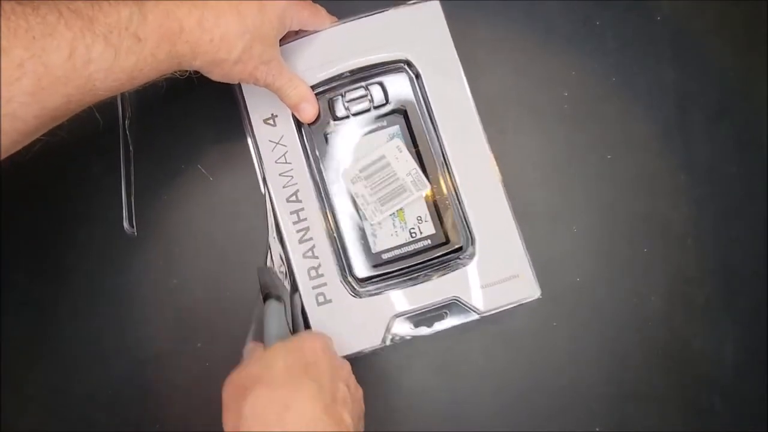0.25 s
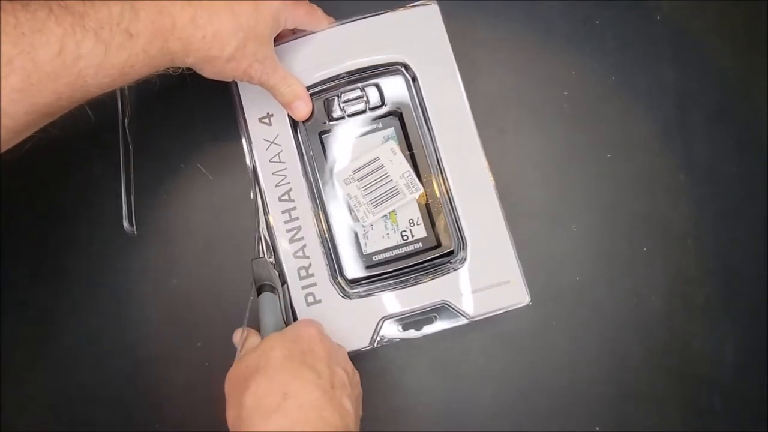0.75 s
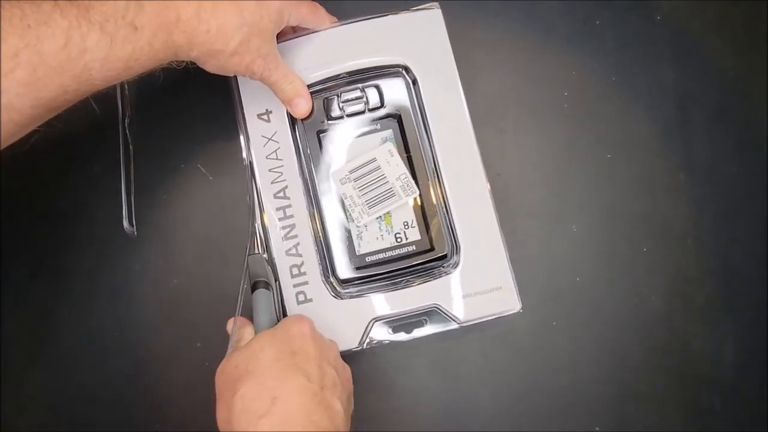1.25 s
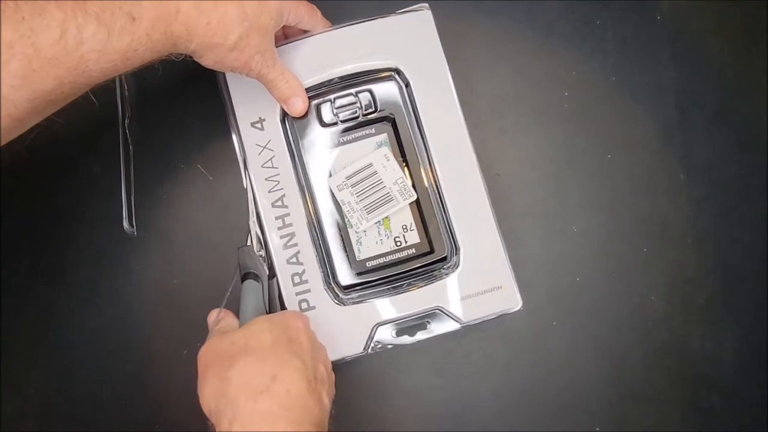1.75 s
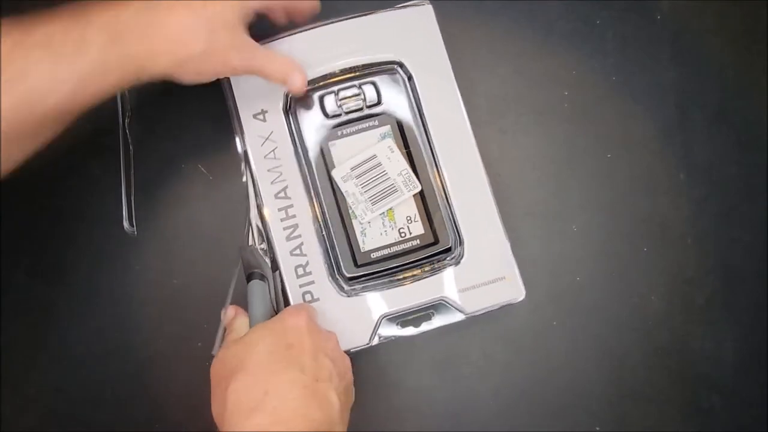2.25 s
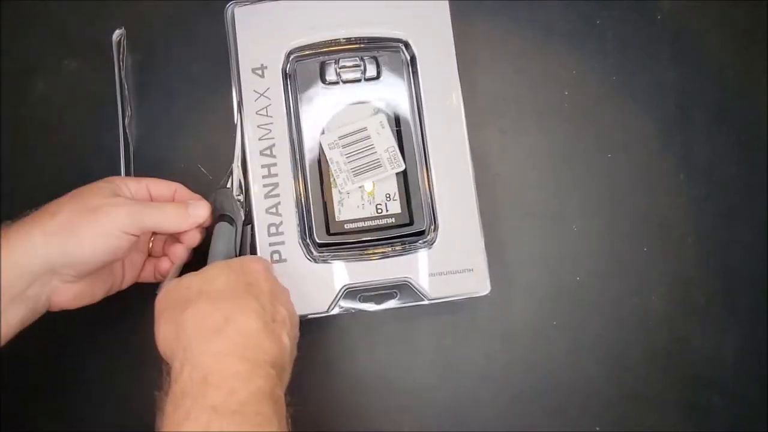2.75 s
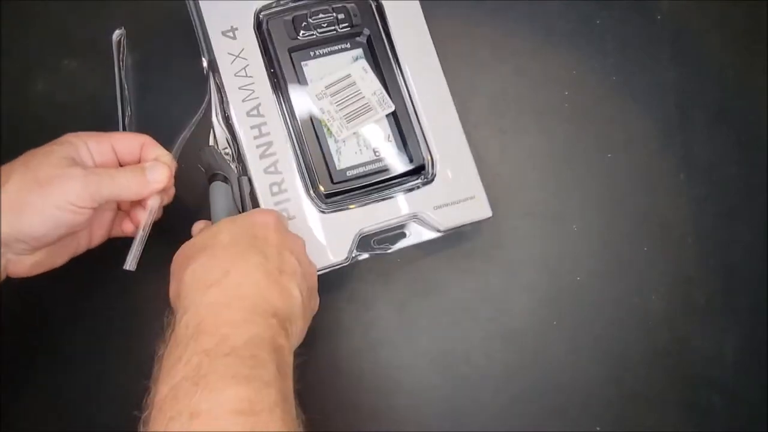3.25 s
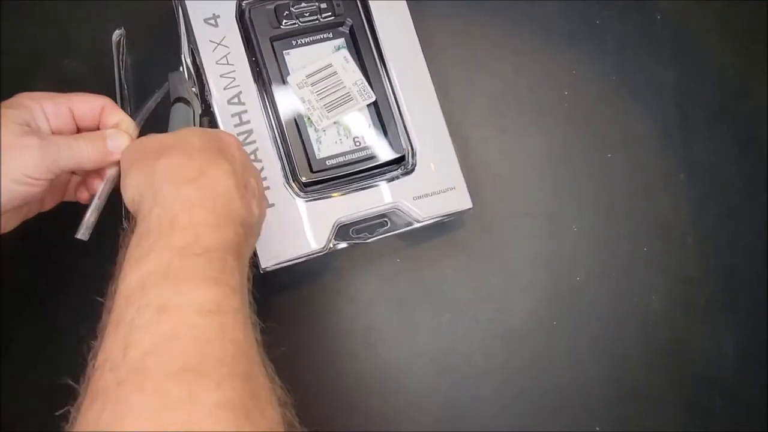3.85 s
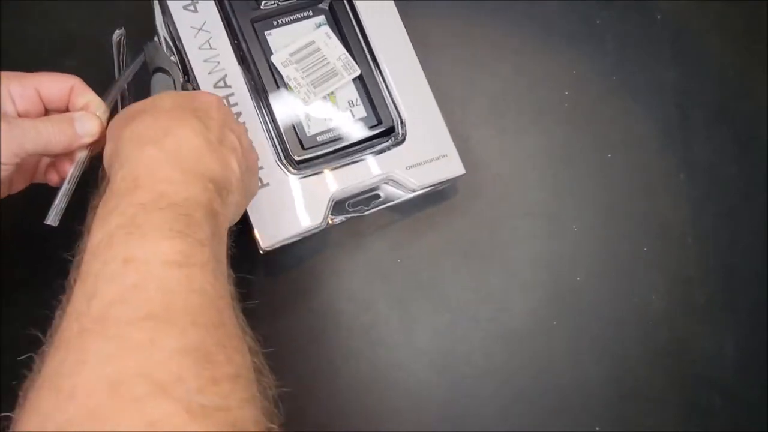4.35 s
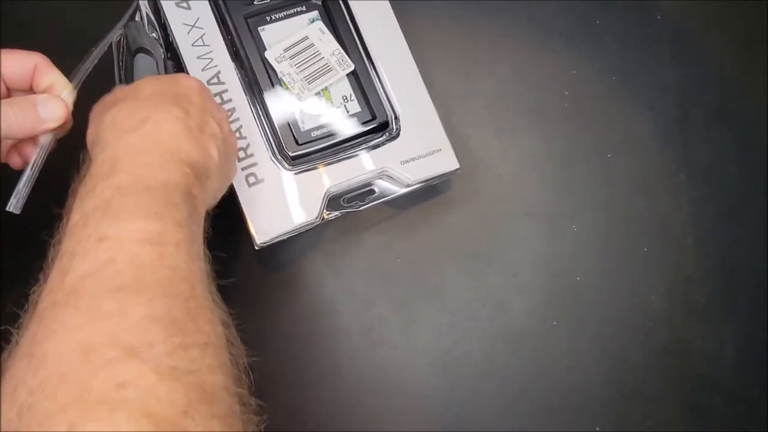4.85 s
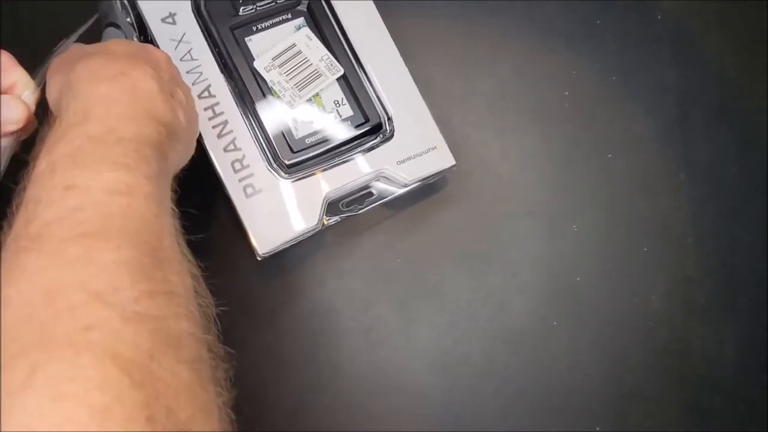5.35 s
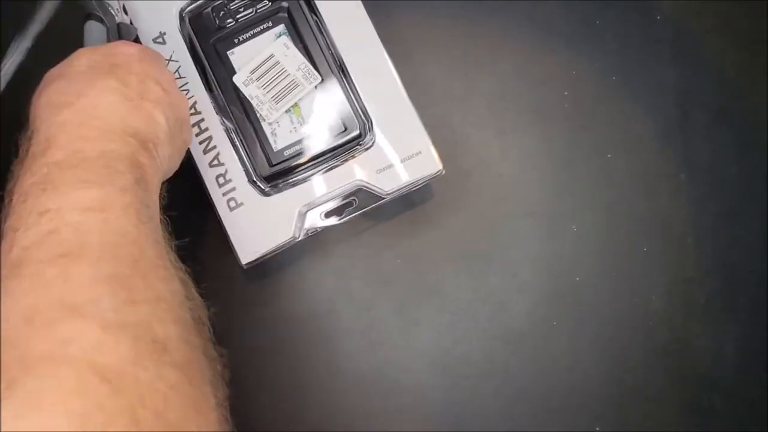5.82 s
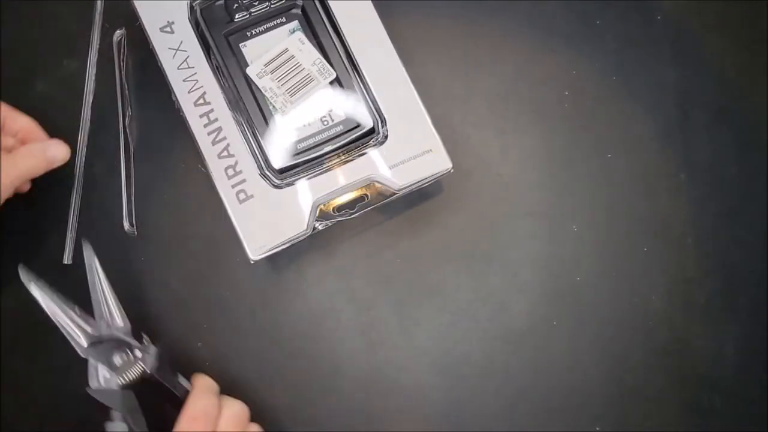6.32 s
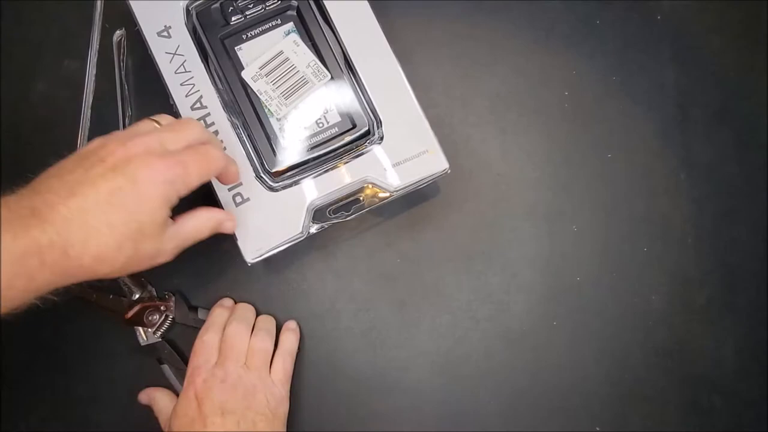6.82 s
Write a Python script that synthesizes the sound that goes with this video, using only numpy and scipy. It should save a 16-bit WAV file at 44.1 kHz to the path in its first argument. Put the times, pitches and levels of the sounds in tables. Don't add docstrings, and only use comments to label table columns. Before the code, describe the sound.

A small dry room, close stereo pickup, the action strongly to the left. At 0.1 s shears snap through stiff plastic: a bright crack, a short loose rattle, a hollow low-mid boom and a touch of steel ring. From 0.2 to 1.8 s come small ticks, film crackles, creaks and soft bumps of the pack. A lighter snip lands at 1.9 s, with a hollow knock at 2.2 s and shifting and rubbing afterward. From 3.1 s cuts come more often, at about 3.1, 3.3, 3.8, 4.1, 4.5, 5.2 and 5.3 s, with blade scrapes and crackling between. A snap at 5.55 s leads to the loudest fast double crack near 5.7 s. Then it falls nearly quiet: tiny ticks, a light tap at 6.2 s, a dull double thud on the table around 6.85 s, and faint brushing to 7.1 s. Faint hiss, low hum and a very thin whine lie underneath.

```python
import sys
import numpy as np
from scipy import signal
from scipy.fft import rfft, irfft, next_fast_len
from scipy.io import wavfile
from scipy.ndimage import uniform_filter1d, map_coordinates

SR = 44100
rng = np.random.default_rng(int(sys.argv[2]) if len(sys.argv) > 2 else 0)


def pcm_store(signal):
    levels = np.round(np.clip(np.atleast_2d(signal), -1, 1) * 32767)
    wavfile.write(sys.argv[1], SR, levels.astype(np.int16).T)


def convert_level_to_amplitude(level_db):
    exponent = np.asarray(level_db, float) / 20
    return 10 ** exponent


N = 312212
SIZE = 8192

# (frequency [Hz], width [Hz], level [dB])
SHELL = [(709, 62, 0.5), (1099.5, 71, 0.5), (1354, 560, -11), (1452, 30, 1.5), (1750, 130, -8),
         (2020, 190, -17.5)]
# (time [s], crack [dB], boom [dB], flap resonance [Hz], top octave [dB])
CUTS = [(0.1097, -15, -6, 9300, -3.5), (1.877, -27.5, -31.5, 6250, -3), (3.1302, -22.5, -10, 4180, -10),
        (3.269, -16.5, -18, 6550, -4.5), (3.7643, -13, -17, 3920, -6), (4.1328, -15.5, -17.5, 3460, -7),
        (4.5209, -19.5, -19.5, 3240, -11), (5.1529, -16, -20.5, 6160, -0.5), (5.3003, -18.5, -28, 2790, -2),
        (5.5621, -18, -26.5, 3100, -5.5), (5.6636, -6.5, -11, 3350, 0.5),
        (5.6973, -7.5, -14.5, 1760, -10.5)]
# (time [s], tick [dB], boom [dB], 1.5-4 kHz [dB])
BITES = [(0.7231, -55, -41, -30), (1.402, -58, -35.5, 1), (1.506, -47.5, -40.5, 0),
         (2.0743, -46, -34.5, 29), (2.2199, -45, -9.5, 18), (2.7137, -42.5, -27.5, -2.5),
         (3.0458, -39, -27, 5), (3.5725, -47, -32, 26), (3.9703, -41, -25, 15), (4.0872, -48, -36, 15),
         (4.324, -41.5, -26, 2.5), (4.3626, -42, -29.5, -19), (4.7108, -40, -23, 6)]


def unit(x):
    return x / np.sqrt(np.mean(x ** 2) + 1e-20)


def peaked(rows):
    return rows / np.abs(rows).max(axis=1, keepdims=True)


def along(points, hz):
    f, v = np.transpose(points)
    return np.interp(np.log(hz + 1), np.log(f + 1), v)


def curves(rows):
    s, *cols = np.transpose(rows)
    return [np.interp(np.arange(N) / SR, s, c) for c in cols]


def filtered(x, response):
    m = next_fast_len(x.shape[-1] + SIZE // 4)
    return irfft(rfft(x, m) * response(np.fft.rfftfreq(m, 1 / SR)), m)[..., :x.shape[-1]]


def modes(resonances):
    return lambda f: sum((-1) ** k * convert_level_to_amplitude(db) * 1j * f * w / (c * c - f * f + 1j * f * w)
                         for k, (c, w, db) in enumerate(resonances))


def bursts(count, rise, t60):
    t = np.arange(SIZE) / SR
    return rng.standard_normal((count, SIZE)) * (1 - np.exp(-t / rise)) * convert_level_to_amplitude(-60 * t / t60)


def pushed(contact):
    u = np.arange(SIZE) / SR / np.c_[contact]
    return np.sin(np.pi * np.minimum(u, 1)) ** 2


def laid(times, rows):
    first = np.round(np.asarray(times) * SR).astype(int)[:, None]
    at = first + np.arange(SIZE) + SIZE
    return np.bincount(at.ravel(), rows.ravel(), N + SIZE + SR)[SIZE:SIZE + N]


def snaps():
    s, db, mid_db, top_db, rattle_db, ring_hz = np.transpose(partings())
    count = len(s)
    crack = peaked(bursts(count, rise=0.00012, t60=0.0045))
    chatter = convert_level_to_amplitude(3.5 * np.kron(rng.standard_normal((count, SIZE // 64)), np.ones(64)))
    rattle = convert_level_to_amplitude(rattle_db)[:, None] * chatter * bursts(count, rise=0.00031, t60=0.2)
    creep_n = 500
    swell_db = -29 - 60 * np.arange(creep_n)[::-1] / SR / .028
    creep = convert_level_to_amplitude(swell_db) * rng.standard_normal((count, creep_n))
    tear = np.hstack([creep, (crack + rattle)[:, :-creep_n]])

    late = signal.lfilter([.6], [1, -.4], bursts(2 * count, rise=0.0089, t60=0.23))
    scatter = convert_level_to_amplitude(-7.5) * bursts(2 * count, rise=0.0086, t60=0.059) + convert_level_to_amplitude(-22.5) * late

    slope = lambda f: np.array([along([(500, m - 22), (1500, m + 3), (3200, m + 2), (6000, 0.0065),
                                       (11000, h + 3), (16000, h - 1)], f)
                                for m, h in zip(mid_db, top_db)])
    bumps = 1.8 * rng.standard_normal((count, 40))
    uneven = lambda f: np.array([along(np.c_[np.geomspace(1200, 16000, len(row)), row], f) for row in bumps])
    flap = lambda f: 6.8 * np.exp(-(np.log((f + 1) / ring_hz[:, None]) / 0.17) ** 2)
    colour = lambda f: convert_level_to_amplitude(slope(f) + uneven(f) + flap(f))
    direct, *far = filtered(np.array([tear, *scatter.reshape(2, -1, SIZE)]), colour)
    gain = convert_level_to_amplitude(db + 8.5)[:, None] / np.abs(direct).max(axis=1, keepdims=True)
    start = s + .0006 - creep_n / SR
    return laid(start, gain * direct), np.array([laid(s + .003, gain * rows) for rows in far])


def partings():
    # (time [s], peak [dB], flap resonance [Hz])
    flicks = [(0.067, -28.5, 9940), (0.962, -44, 9030), (1.5303, -42, 12700), (1.6138, -37.5, 8700),
              (2.4555, -33, 10000), (2.7357, -33, 7460), (3.0847, -36.5, 7300), (3.2027, -32.5, 8200),
              (5.119, -39.5, 12900), (1.9859, -43, 14200)]
    # (time [s], peak [dB], top octave [dB])
    crackles = [(0.9815, -33.5, -9), (1.0305, -40.5, 4), (1.331, -47.5, -8), (1.7217, -49, -9),
                (2.159, -44, -7), (2.2656, -35.5, -2), (3.1668, -22.5, -0.5), (4.4065, -30, 0),
                (4.7673, -31, -10), (4.783, -26, -2.5), (5.0775, -45, -22), (5.2438, -31.5, -4.5),
                (5.9303, -43, -1)]
    # (time [s], peak [dB])
    ticks = [(0.0011, -35), (1.828, -70), (2.235, -34), (3.39, -54.5), (3.421, -62), (3.736, -47.5),
             (6.2257, -35.5), (0.56, -50.5), (0.817, -49.5), (1.2357, -54.5), (1.848, -50), (5.048, -49),
             (5.987, -58), (6.1627, -50), (6.288, -55), (6.5766, -53), (6.8289, -54), (7.073, -53.5),
             (0.969, -50), (1.082, -53), (1.439, -54), (1.494, -55), (1.97, -51), (1.7, -52), (1.979, -44),
             (2.101, -49.5), (6.6, -56.5), (0.428, -60), (0.34, -52), (0.21, -47)]
    # (time [s], peak [dB], pitch [Hz])
    specks = [(0.2134, -44, 9270), (0.2216, -35, 14400), (0.2324, -43, 14000), (0.2593, -47, 4620),
              (0.5761, -53, 7800), (0.5874, -52, 4880), (0.602, -39.5, 4860), (0.6436, -39, 4390),
              (0.667, -44, 8940), (0.7861, -55, 8350), (0.9038, -51, 4600), (1.1238, -46, 6890),
              (1.1494, -62, 8360), (1.2464, -59, 8370), (1.2955, -52, 4020), (1.3404, -49, 9080),
              (1.3957, -51, 4040), (1.4351, -54, 8370), (1.5643, -40, 10700), (1.6811, -45, 5950),
              (1.7409, -48, 4270), (1.7714, -52, 4700), (1.8884, -36, 7400), (2.1114, -44, 4310),
              (2.3294, -51, 4630), (2.3544, -55, 8360), (2.538, -46, 4760), (2.615, -48, 4160),
              (2.8124, -60, 4140), (2.9424, -54, 4030), (3.037, -42, 4810), (3.2364, -34, 6770),
              (3.5572, -43.5, 6600), (3.6014, -44, 4450), (3.629, -34.5, 9770), (4.4584, -54, 4340),
              (4.6897, -50, 4650), (4.7024, -41, 4130), (4.7775, -20, 12800), (4.8894, -46, 5700),
              (4.9671, -45, 8120), (5.5243, -57, 4020)]
    return ([(s, db, 1.5, top, -26, hz) for s, db, _, hz, top in CUTS]
            + [(s, db, mid, -7, -22.5, 3010) for s, db, _, mid in BITES]
            + [(s, db, -2.5, -2.5, -30, hz) for s, db, hz in flicks]
            + [(s, db, 2.5, top, -34.5, 3350) for s, db, top in crackles]
            + [(s, db, 13, -5, -23, 1870) for s, db in ticks]
            + [(s, db - 8.5, -6, -1, -31, hz) for s, db, hz in specks])


def blades():
    # (time [s], peak [dB], low [Hz], middle [Hz], high [Hz])
    rings = [(0.1104, -11, 2910, 3540, 6860), (0.981, -29, 3410, 3850, 4800),
             (1.8766, -29, 2870, 3760, 6150), (3.13, -27, 3500, 4240, 6650),
             (3.166, -19.5, 2940, 4250, 6940), (3.269, -15, 2970, 3550, 6780),
             (3.7635, -20, 3070, 4000, 5080), (4.1331, -6, 2960, 4100, 5860),
             (4.3998, -24, 3180, 3700, 6250), (4.5199, -19, 3360, 3660, 6240),
             (4.7671, -25, 3410, 3570, 4960), (5.154, -17.5, 3080, 3900, 6220),
             (5.299, -23, 2580, 4050, 5200), (5.561, -26.5, 3370, 4290, 5050),
             (5.6628, -9, 3260, 3650, 4900), (5.6979, -4.5, 3370, 3600, 5300)]
    width_hz = 120
    s, db, *hz = np.transpose(rings)
    band = lambda f: sum(1j * f * width_hz / (c[:, None] ** 2 - f * f + 1j * f * width_hz) for c in hz)
    drive = bursts(len(s), rise=.0001, t60=0.0045) + .25 * bursts(len(s), rise=.001, t60=.05)
    return laid(s, convert_level_to_amplitude(db - 10)[:, None] * peaked(filtered(drive, band)))


def jolts():
    s, db, shell_db, wall_hz = np.transpose(pushes())
    push = pushed(np.full(len(s), 0.001)) + 0.3 * bursts(len(s), rise=0.0006, t60=0.04)
    boom = peaked(filtered(push, hollow))
    near = lambda f: 0.36 + np.exp(-(np.log((f + 1) / wall_hz[:, None]) / 0.39) ** 2)
    soft = lambda f: near(f) * modes(SHELL)(f) * 1j * f / (400 + 1j * f) / (1 + 1j * f / 2500) ** 2
    walls = peaked(filtered(bursts(len(s), rise=0.0005, t60=.022), soft))
    return laid(s - .001, convert_level_to_amplitude(db - 2.0)[:, None] * (boom + convert_level_to_amplitude(shell_db + 3.5)[:, None] * walls))


def pushes():
    # (time [s], peak [dB], walls [dB], wall pitch nearest the contact [Hz])
    shoves = [(0.001, -32, 9, 1060), (0.073, -29, -3.5, 700), (0.112, -25, 3, 601), (0.204, -44, -1, 1150),
              (0.239, -31, -6.5, 1100), (0.372, -29, -11, 840), (0.495, -32.5, -8, 860),
              (0.597, -29.5, -7.5, 810), (1.002, -28, -9.5, 807), (1.185, -44, -5, 910),
              (1.538, -33, -21, 800), (1.646, -48, 7, 1300), (1.937, -35, -10, 1060), (2.174, -40, 5, 900),
              (2.513, -42, -28, 800), (2.736, -28.5, -2.5, 710), (3.168, -24, -5, 1100),
              (3.207, -29, -9, 895), (3.613, -29.5, -9.5, 805), (4.405, -48, -12, 900),
              (4.572, -38, -11, 890), (4.761, -24.5, -20.5, 800), (4.948, -28, -6, 820),
              (5.322, -26.5, -3.5, 892), (5.665, -21.5, 11.5, 620), (5.699, -20.5, 4, 567),
              (6.012, -44.5, -3.5, 900), (6.226, -39.5, 4.5, 1500), (6.844, -40, -20, 710)]
    return ([(s + 0.0011, boom, -6, 1050) for s, _, boom, *_ in CUTS]
            + [(s + 0.0016, boom, -10, 1060) for s, _, boom, _ in BITES] + shoves)


def hollow(f):
    # (frequency [Hz], width [Hz], level [dB])
    pack_modes = [(373.8, 77, 4), (343, 86, -0.5), (395.2, 52, -11), (470, 110, -2.5), (522.7, 50, -0.5),
                  (258, 50, -5.5), (214, 60, -7.5)]
    return modes(pack_modes)(f) * (1j * f / (170 + 1j * f)) ** 2 / (1 + 1j * f / 1200)


def strokes():
    # (frequency [Hz], level [dB per Hz])
    rub_spectrum = [(350, -35), (600, -12), (765, -10), (875, -9), (1090, -5), (2090, -20.5), (3000, -25.5),
                    (3900, -56.5), (6600, -120)]
    # (frequency [Hz], level [dB per Hz])
    scrape_spectrum = [(1300, -33), (2300, -7.5), (3500, 0), (6000, -8.5), (10000, -9.5), (16000, -14.5)]
    rub_colour = lambda f: convert_level_to_amplitude(along(rub_spectrum, f)) * (.5 + modes(SHELL)(f))
    scrape_colour = lambda f: convert_level_to_amplitude(along(scrape_spectrum, f))
    creak = unit(filtered(slips(120, spread_db=4, clump_db=3.5, tick=0.83), hollow))
    rub = unit(filtered(slips(300, spread_db=4, clump_db=3.5, tick=2.2), rub_colour))
    scrape = unit(filtered(slips(640, spread_db=0.5, clump_db=4.5, tick=1.5), scrape_colour))
    rumble = unit(filtered(slips(63, spread_db=4, clump_db=4.5, tick=0.4), table))
    layers = pressure() * [creak, rub, scrape, rumble]
    return layers[:3].sum(axis=0) + handling(), layers[3]


def slips(rate, spread_db, clump_db, tick):
    grain = lambda r: map_coordinates(rng.standard_normal(int(N * r / SR) + 4), [np.arange(N) * r / SR])
    ticks = (rng.random(N) < 45 / SR) * rng.random(N)
    jumps = 1 + tick * signal.lfilter([1], [1, -np.exp(-1 / (0.007 * SR))], ticks)
    return rng.standard_normal(N) * jumps * convert_level_to_amplitude(spread_db * grain(rate) + clump_db * grain(35))


def pressure():
    # (time [s], grip [dB])
    grip = [(0, -47.5), (.35, -58.5), (1.02, -58), (1.8, -58), (2.4, -60), (3, -58.5), (3.5, -54),
            (4.3, -56.5), (5, -54), (5.45, -58), (5.88, -68.5), (6.4, -81.5), (6.9, -86), (7.08, -62)]
    # (time [s], length [s], pack creak [dB], blade scrape [dB])
    presses = [(0.001, 0.11, -49.5, -60), (0.078, 0.091, -35.5, -34.5), (0.419, 0.035, -43, -79),
               (0.558, 0.13, -47.5, -55), (0.959, 0.095, -41, -57), (1.5, 0.15, -48.5, -62),
               (1.574, 0.12, -45, -52), (1.865, 0.12, -40.5, -55.5), (2.219, 0.097, -42.5, -51.5),
               (3.134, 0.1, -29.5, -53), (3.558, 0.14, -40.5, -49), (3.969, 0.11, -42, -44.5),
               (4.352, 0.09, -34, -43.5), (4.482, 0.039, -52, -54), (4.69, 0.16, -36.5, -42),
               (4.926, 0.07, -42, -55), (5.055, 0.15, -40.5, -48.5), (5.309, 0.043, -39, -43),
               (5.514, 0.044, -53, -55.5), (5.582, 0.28, -52.5, -44.5), (5.68, 0.036, -20.5, -22)]
    # (time [s], length [s], pack creak [dB], blade scrape [dB])
    glides = [(0.493, 0.07, -46.5, -86), (0.713, 0.11, -60, -99), (1.235, 0.093, -53, -103),
              (1, 0.054, -51, -83), (6.575, 0.04, -65.5, -75), (2.09, 0.037, -45, -44.5),
              (0.17, 0.026, -47, -44), (0.2464, 0.066, -44.5, -44), (0.811, 0.11, -48.5, -83),
              (1.116, 0.031, -61, -61), (1.343, 0.11, -53, -108), (1.713, 0.045, -60, -53.5),
              (1.975, 0.08, -42, -54.5), (2.058, 0.055, -44, -47), (2.154, 0.045, -47.5, -45.5),
              (3.048, 0.089, -42, -60.5), (3.371, 0.057, -41, -83), (3.72, 0.028, -68, -82),
              (3.7, 0.033, -61, -44.5), (4.537, 0.048, -35, -49.5), (5.202, 0.22, -49, -64),
              (6.9, 0.038, -58, -79.5), (6.226, 0.069, -59.5, -60.5), (5.6, 0.044, -80.5, -73),
              (2.1, 0.048, -37, -54), (4.7, 0.053, -57, -56), (4.6, 0.04, -54.5, -49),
              (1.925, 0.022, -50.5, -60), (4.96, 0.076, -55, -66), (0.3, 0.035, -48.5, -51.5)]
    held_db = np.c_[[-61.5, -67, -80, -72.5]]
    growth = np.c_[[0.91, 0.7, 0.32, 0.8]]
    rise = np.c_[[0.15, 0.15, 0.37, 0.15]]
    ease = 0.51
    gain = convert_level_to_amplitude(held_db + growth * (curves(grip)[0] + 60))
    for rows, rub_db, rumble_db in (presses, -0.85, -8.5), (glides, 4.5, -20):
        for s, length, creak, blade in rows:
            first = max(round(s * SR), 0)
            u = np.linspace(0, 1, round((length + 0.015) * SR))[:N - first]
            ramp = np.minimum(1, np.minimum(u / rise, (1 - u) / ease))
            swell = np.sin(np.pi / 2 * ramp) ** 2
            rub = creak + 0.27 * (blade - creak) + rub_db
            db = [creak, rub, blade, creak + rumble_db]
            gain[:, first:first + len(u)] += convert_level_to_amplitude(np.array(db) - 5.0)[:, None] * swell
    return gain


def handling():
    # (frequency [Hz], level [dB per Hz])
    skin_spectrum = [(900, -26), (1800, -2.5), (3000, 0.5), (4800, -9), (6500, -23), (16000, -37.5)]
    # (time [s], brushing [dB])
    palms = [(0, -74), (.5, -76), (1.2, -78), (1.8, -74), (2.4, -75), (2.7, -67), (3, -72), (4, -71),
             (5.4, -76), (5.9, -80), (6.4, -85.5), (6.9, -83.5), (7.08, -73.5)]
    # (frequency [Hz], level [dB per Hz])
    fissure_spectrum = [(300, -19.5), (900, 4.5), (2000, 1.5), (3500, -8.5), (6000, -27.5), (16000, -37)]
    per_s, decay_s, spread_db = 260, 0.0007, 4
    brushing = slips(81, spread_db=0.5, clump_db=1.5, tick=.3)
    skin = unit(filtered(brushing, lambda f: convert_level_to_amplitude(along(skin_spectrum, f))))
    starts = (rng.random(N) < per_s / SR) * convert_level_to_amplitude(spread_db * rng.standard_normal(N))
    dying = signal.lfilter([1], [1, -np.exp(-1 / (decay_s * SR))], starts)
    cracks = filtered(dying * rng.standard_normal(N), lambda f: convert_level_to_amplitude(along(fissure_spectrum, f)))
    return convert_level_to_amplitude(curves(palms)[0]) * skin + convert_level_to_amplitude(6) * pressure()[1] * cracks


def thuds():
    # (time [s], peak [dB], contact [s])
    landings = [(0.104, -33, 0.0064), (0.596, -46, 0.0043), (0.994, -55, 0.0038), (3.167, -37.5, 0.0051),
                (3.973, -44, 0.0059), (4.362, -35.5, 0.004), (4.708, -44, 0.0041), (5.289, -45.5, 0.0027),
                (5.665, -41, 0.0048), (6.225, -52.5, .003), (6.573, -56.5, 0.0098), (6.806, -45.5, 0.0066),
                (6.829, -31.5, .0028), (6.856, -30.5, .003), (6.883, -44, 0.0043), (6.912, -47, .003),
                (3.061, -51, .006), (0.492, -50, 0.0051), (4.93, -50, 0.0068), (5.57, -53, 0.0089)]
    s, db, contact = np.transpose(landings)
    return laid(s, convert_level_to_amplitude(db + 3.5)[:, None] * peaked(filtered(pushed(contact), table)))


def table(f):
    # (frequency [Hz], width [Hz], level [dB])
    board_modes = [(69, 10, -5), (182, 30, -4.5), (41.4, 18, -16), (135, 26, -16.5), (326.3, 37, -10)]
    return modes(board_modes)(f) / (1 + 1j * f / 320) ** 2


def ports(x):
    # (frequency [Hz], left-right [dB])
    lean_points = [(60, 14), (110, 11.5), (200, 7), (380, 20.5), (700, 12.5), (1290, 12), (2380, 13.5),
                   (4400, 14), (8120, 12.5), (11000, 10), (15000, 11.5)]
    # (time [s], lead [samples])
    lead_path = [(0, 6), (3.4, 7), (3.7, 10), (5.3, 9), (7.1, 10)]
    # (time [s], left-right [dB])
    swing_path = [(0, -3.5), (4.8, -2), (5.3, -2.5), (5.6, -4.5), (6.3, -6), (7.1, 0)]
    bump = lambda f: np.exp(-(np.log((f + 1) / 420) / 0.66) ** 2)
    lag = lambda f: np.exp(-1j * 1.1 * bump(f) * [[0], [1]])
    lean = lambda f: lag(f) * convert_level_to_amplitude(along(lean_points, f) * [[.5], [-.5]])
    pair = filtered(x * convert_level_to_amplitude(curves(swing_path)[0] * [[.5], [-.5]]), lean)
    late = np.maximum(np.arange(N) - np.round(curves(lead_path)[0]).astype(int), 0)
    return np.array([pair[0], pair[1][late]])


def room(x, count=3):
    # (frequency [Hz], t60 [s])
    decay = [(100, .33), (260, 0.18), (700, 0.21), (1840, 0.096), (4850, 0.29), (12800, 0.19)]
    # (frequency [Hz], share of power)
    alike = [(100, 0.83), (260, 0.51), (500, 0.29), (2000, 0.043)]
    turn, wet = np.arange(N) // (SR // 6) % count, 0
    for k in range(count):
        hz, t, z = signal.stft(rng.standard_normal((3, SR // 3)), SR, nperseg=256)
        share = along(alike, hz)[:, None]
        z = np.sqrt(share) * z[2] + np.sqrt(1 - share) * z[:2]
        tail = signal.istft(z * convert_level_to_amplitude(-60 * t / along(decay, hz)[:, None]), SR, nperseg=256)[1]
        part = np.pad(x * uniform_filter1d(1. * (turn == k), size=400), (260, 0))
        wet = wet + signal.fftconvolve(part[None], tail / np.linalg.norm(tail[0]), axes=1)[:, :N]
    return wet


def floor():
    # (frequency [Hz], level [dB per Hz])
    hiss_spectrum = [(15, -51.5), (25, -6), (65, 2), (433, -12.5), (1280, -13), (7920, -30.5),
                     (8600, -33.5), (15200, -27.5), (16500, -50.5)]
    # (frequency [Hz], level [dB])
    tones = [(59.2, -81), (8360, -82.5)]
    own, shared = rng.standard_normal((2, N)), rng.standard_normal(N)
    hiss = unit(filtered(own + 0.76 * shared, lambda f: convert_level_to_amplitude(along(hiss_spectrum, f))))
    steady = sum(convert_level_to_amplitude(db - 2.5) * np.sin(2 * np.pi * hz * np.arange(N) / SR) for hz, db in tones)
    return convert_level_to_amplitude(-70) * hiss + steady


def scene():
    pack, (slide, rumble), (sheet, scatter) = jolts(), strokes(), snaps()
    board = thuds() + rumble
    near = ports(pack + slide + sheet + blades()) + board * convert_level_to_amplitude([[.6], [-.6]])
    return near + scatter + room(convert_level_to_amplitude(-3) * (pack + slide) + convert_level_to_amplitude(-5.0) * board) + floor()


def low_pass(x):
    return signal.sosfilt(signal.butter(12, 16990, fs=SR, output="sos"), x)


def record(dry):
    # (frequency [Hz], level [dB])
    mic_top = [(15300, -1), (15800, -8.5), (16200, -38), (17000, -49.5)]
    soft = dry / (1 + np.abs(dry / .88) ** 6) ** (1 / 6)
    return low_pass(filtered(soft, lambda f: convert_level_to_amplitude(along(mic_top, f))))


dry = scene()
out = record(dry)
pcm_store(out)
```